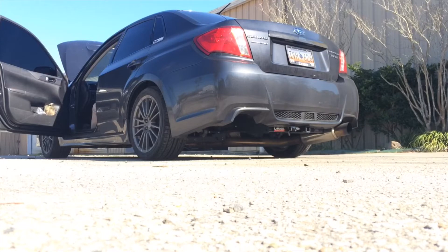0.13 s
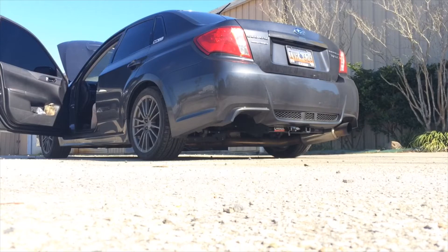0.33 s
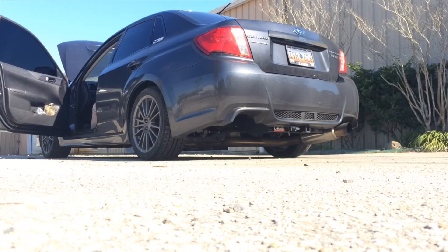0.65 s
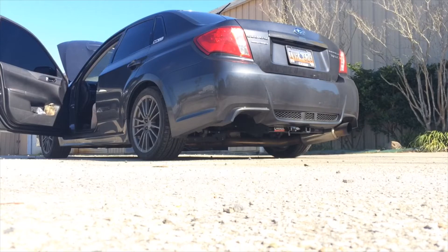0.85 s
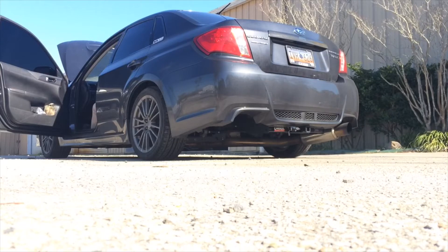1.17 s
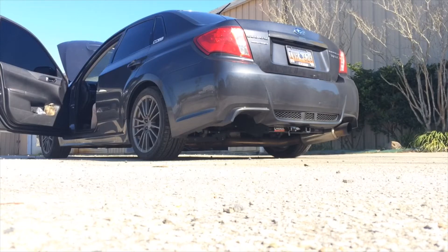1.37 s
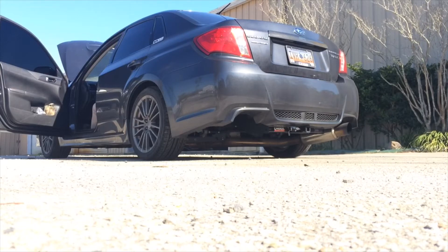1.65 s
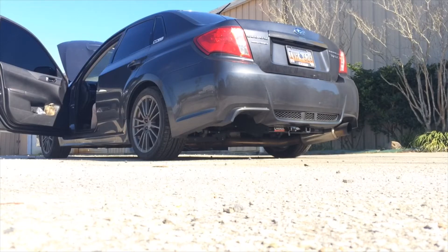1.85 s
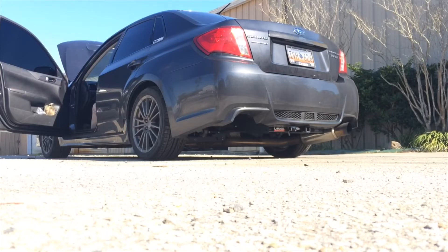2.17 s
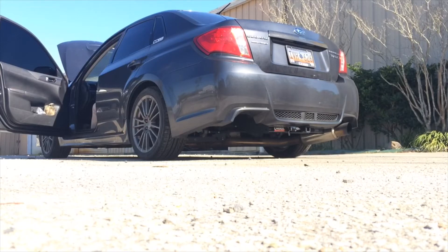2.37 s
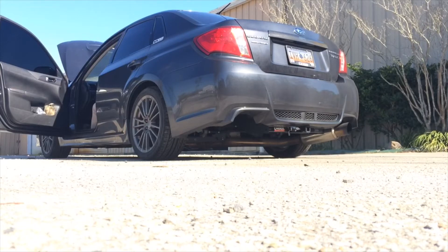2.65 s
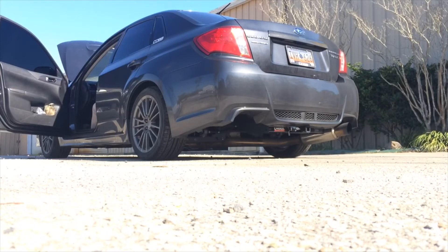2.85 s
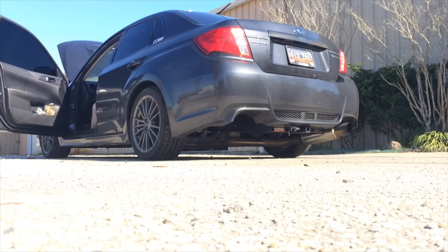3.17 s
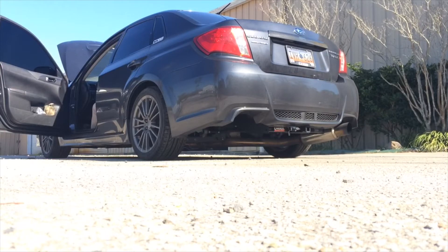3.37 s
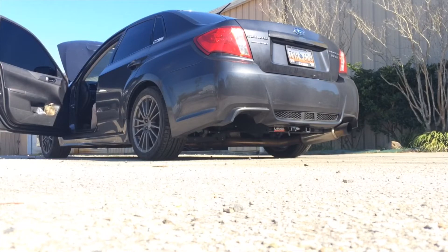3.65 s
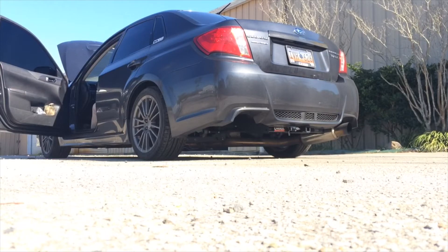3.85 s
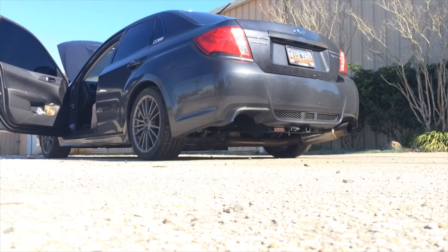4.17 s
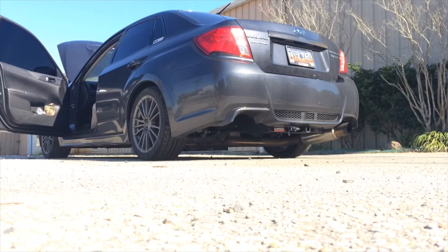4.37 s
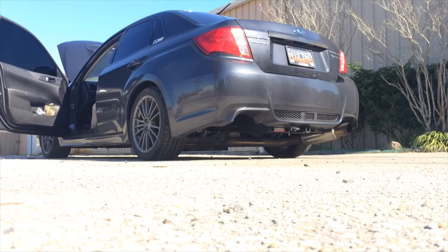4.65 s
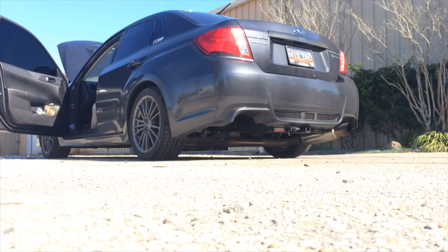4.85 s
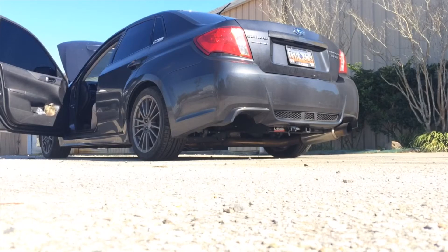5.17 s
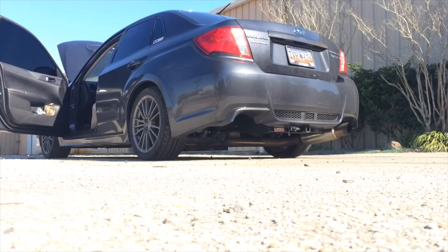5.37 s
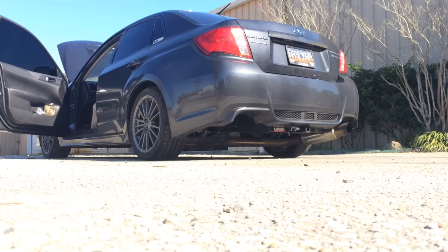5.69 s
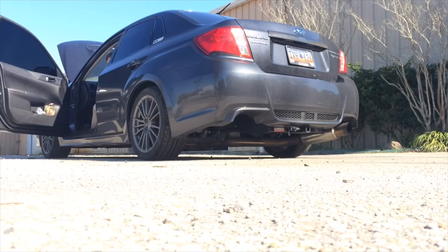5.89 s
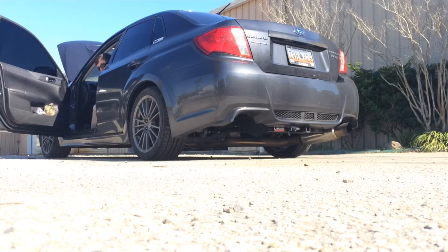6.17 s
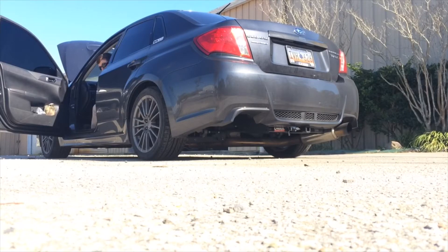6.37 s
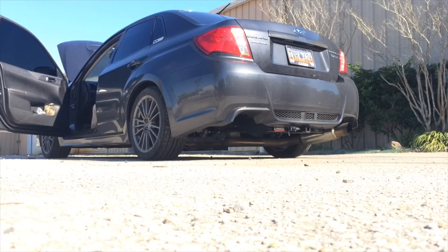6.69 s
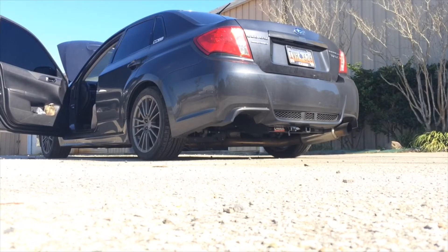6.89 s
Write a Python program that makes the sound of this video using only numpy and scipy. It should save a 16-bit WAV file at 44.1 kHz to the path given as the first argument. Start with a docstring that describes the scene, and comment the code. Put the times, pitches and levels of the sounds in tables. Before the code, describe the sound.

A turbocharged four-cylinder car idles with a lumpy lope, then is revved twice, barking and popping from the exhaust as the revs fall.

```python
"""An idling turbocharged flat-four lopes unevenly in a fenced yard, then its throttle is blipped twice.
Unequal headers make the firings lope; each one booms in the silencer and, when strong, steepens into a bark.
Shaped noise gives the rush of gas, and a wavering tone the turbo as it spins up and coasts down.
The strongest firings crack during the blips, and unburnt fuel pops in the pipe mostly as the revs fall.
Belts and valves whirr behind, metal squeaks faintly, and fence, wall and ground reflect it all."""
import sys
import numpy as np
from scipy import signal
from scipy.fft import rfft, irfft
from scipy.io import wavfile
from scipy.ndimage import uniform_filter1d, minimum_filter1d

SR = 44100
rng = np.random.default_rng(int(sys.argv[2]) if len(sys.argv) > 2 else 0)


def int16_out(signal):
    """Quantize to a 16-bit WAV file."""
    q = np.round(np.clip(np.atleast_2d(signal).T, -1, 1) * 32767)
    wavfile.write(sys.argv[1], SR, q.astype(np.int16))


N = 310023
TIME = np.arange(N) / SR

IDLE_HZ, IDLE_LOPE = 22, .45  # firings per second at idle; share of the lope left there
JITTER_S, BOOM_SCATTER_DB = .0005, 1.7  # chance in each firing at idle speed
# on throttle the cylinders push alike, until the pulses crowd each other in the headers near the top speed
EVEN_SHARE, CROWDED_HZ, CROWDING_SPAN_HZ = 0.718, 90.8, 17
# crowded pulses no longer break into sharp fronts: top speed for them, and the span over which they round off
SHARP_BELOW_HZ, SHARP_SPAN_HZ = 84.5, 3
# the four cylinders in firing order, with their differences at full lope: (header delay [ms], boom [dB],
# bark off throttle [dB], time of the reflection in the header [ms], its level [dB])
CYLINDERS = [(0.1, -0.5, 1.5, 18.3, -14), (-2.5, -2, -7, 10.3, -6), (-2.8, -4.5, -10, 10.6, -11),
             (-0.3, 1, 0.5, 18.3, -22)]


def exhaust(rate, turns):
    """Four cylinders fire in turn; each firing booms, barks and drags a puff of turbulence after it."""
    throttle, boom_db, bark_db, rasp_db, hiss_db = effort(rate)
    number = np.arange(int(turns[-1]))
    times = np.interp(number + .39, turns, TIME)
    lag_ms, own_boom_db, own_bark_db, header_ms, header_db = np.array(CYLINDERS)[number % len(CYLINDERS)].T
    time_chance, boom_chance, front_chance = rng.standard_normal((3, len(times)))

    def at(control):
        """Read a slowly changing control at each firing."""
        return np.interp(times, TIME, control)

    speed = at(rate)
    uncrowded = np.clip((CROWDED_HZ - speed) / CROWDING_SPAN_HZ, 0, 1)
    coasting = 1 - np.clip(EVEN_SHARE * at(throttle) * uncrowded, 0, 1)
    share = np.sqrt(SR / speed)  # a level is spread over fewer, larger pulses at low speed
    unsteady = IDLE_HZ / speed  # the flywheel evens out the firings as the speed rises
    # at idle the pulses are too far apart to disturb each other
    lope = coasting * np.clip(IDLE_LOPE / unsteady ** 2, 0, 1)
    fired = times + lope * lag_ms / 1000 + JITTER_S * time_chance * unsteady ** 2

    thud_db = at(boom_db) + lope * own_boom_db + BOOM_SCATTER_DB * boom_chance * np.sqrt(unsteady)
    thuds = boom(fired, share * undb(thud_db - 6.5), header_ms / 1000, header_db, coasting)
    # combustion is least steady at idle
    rumble = noise(THUD_COLOUR) * undb(boom_db - 8 - .17 * rate)

    push_db = coasting * (own_bark_db - 0.5)
    front_db = at(bark_db) + push_db
    barks = bark(fired, share, front_db)
    sharp = at(throttle * np.clip((SHARP_BELOW_HZ - rate) / SHARP_SPAN_HZ, 0, 1))
    fronts = shocks(fired, front_db + 0.3 * push_db + SHOCK_SCATTER_DB * front_chance, sharp)

    # at full strength the energy goes into the fronts, so ringing and roar level off
    body_db = bark_db - .45 * np.maximum(bark_db + 35, 0)
    ring = np.hypot(undb(at(body_db) + 0.4 * push_db - 6), at(overrun_growl()))
    growl = tailpipe(clicks(fired, share * ring))

    puff = puffs(fired, undb(push_db))
    gas = roar(puff, body_db, throttle) + rasp(puff, rasp_db, throttle)
    return drone(thuds, rate) + rumble + growl + hollow(pipe(barks + fronts + gas)) + hiss(puff, hiss_db)


OPEN_S, CLOSE_S = 0.033, 0.03
# the rush of gas follows the throttle late and dies away; a softer suck of air comes before it
RUSH_LAG_S, RUSH_FALL_DB_PER_S = .11, 25.5
SUCK_LEAD_S, SUCK_DB = 0.09, -67.5
CATCH_S, DIE_S, SURGE_S, OVERRUN_BOOM_DB = 0.047, 0.032, 0.27, 1
SPUTTER_EDGE_S = 0.016
# Levels here are balance settings between the layers, before each layer's own trim.
# the exhaust with the throttle shut: (firings per second [Hz], boom [dB], bark [dB], rasp [dB], hiss [dB])
COASTING = [(19.6, -25, -49, -56.5, -77.5), (29.5, -21, -52.5, -59, -79), (35.8, -19, -49.5, -54.5, -71),
            (46.7, -17.5, -42, -55.5, -68.5), (58, -16, -33, -51, -67.5), (89, -11.5, -33.5, -50.5, -63)]
# the exhaust with the throttle open: (firings per second [Hz], boom [dB], bark [dB], rasp [dB])
PULLING = [(22.4, -13, -49.5, -46), (33.8, -7, -25, -41), (53, -7, -22.5, -39.5), (59, -10, -21, -46),
           (73.2, -7.5, -17, -35), (86.27, -9, -22, -47.5)]
# blips of the throttle: (opens [s], closes [s], extra boom [dB], extra bark [dB], extra rasp [dB],
# rush of gas [dB])
BLIPS = [(0.454, 0.786, 2, -6.5, 0.5, -53), (3.498, 4.007, 1, -1, 3.5, -51.5)]
# spells of overrun, when fuel burns on in the pipe: (start [s], end [s], bark [dB], its fall [dB/s],
# first surge of boom [dB], growl [dB])
OVERRUNS = [(0.942, 1.258, -32.5, 12, 5, -36.5), (4.129, 5.224, -21.5, 16.5, 1.5, -38)]
# breathy sputters of gas: (time [s], length [s], rasp [dB], hiss [dB])
SPUTTERS = [(0.54, 0.018, -34, -64), (0.609, 0.011, -37, -59), (0.883, 0.019, -49, -78),
            (0.955, 0.025, -53, -71), (1.036, 0.032, -44.5, -72), (1.187, 0.023, -49, -69),
            (4.854, 0.032, -53, -77), (5.236, 0.11, -50, -65.5)]


def effort(rate):
    """Throttle (0-1) and levels of boom, bark, rasp and hiss (dB), from speed, blips, overrun and sputters."""
    boom_db, bark_db, rasp_db, hiss_db = at_speed(COASTING, rate)
    pull_boom, pull_bark, pull_rasp = at_speed(PULLING, rate)
    throttle = 0
    for opens, closes, extra_boom_db, extra_bark_db, extra_rasp_db, rush_db in BLIPS:
        pedal = gate(opens, closes, OPEN_S, CLOSE_S)
        throttle = throttle + pedal
        boom_db = blend(boom_db, pull_boom + extra_boom_db, pedal)
        bark_db = blend(bark_db, pull_bark + extra_bark_db, pedal)
        rasp_db = blend(rasp_db, pull_rasp + extra_rasp_db, pedal)
        hiss_db = blend(hiss_db, SUCK_DB, gate(opens - SUCK_LEAD_S, closes, OPEN_S, CLOSE_S))
        rush = rush_db - RUSH_FALL_DB_PER_S * (TIME - opens - RUSH_LAG_S)
        hiss_db = blend(hiss_db, rush, gate(opens + RUSH_LAG_S, closes, OPEN_S, CLOSE_S))
    for start, end, burn_db, fall, surge_db, _ in OVERRUNS:
        burning = gate(start, end, CATCH_S, DIE_S)
        age = np.maximum(TIME - start - CATCH_S, 0)
        bark_db = blend(bark_db, burn_db - fall * age, burning)
        boom_db = boom_db + burning * (OVERRUN_BOOM_DB + surge_db * np.exp(-(age / SURGE_S) ** 2))
    for start, length, sputter_rasp_db, sputter_hiss_db in SPUTTERS:
        sputter = gate(start, start + length, SPUTTER_EDGE_S, SPUTTER_EDGE_S)
        rasp_db = blend(rasp_db, sputter_rasp_db, sputter)
        hiss_db = blend(hiss_db, sputter_hiss_db, sputter)
    return throttle, boom_db, bark_db, rasp_db, hiss_db


def overrun_growl():
    """Strength of the even ringing that every firing leaves in the tailpipe while fuel burns on."""
    return sum(gate(start, end + DIE_S, CATCH_S, DIE_S) * undb(growl_db)
               for start, end, *_, growl_db in OVERRUNS)


# the far end of the exhaust sends the boom back: delay and share
SILENCER_ECHO_S, SILENCER_RETURN = 0.02965, 0.34
# tone colour of a round thud: (frequency [Hz], level [dB])
THUD_COLOUR = [(20, -25), (40, -12), (62, -1.5), (82, -3.5), (103, 5), (120, 3), (142, 1.4), (175, -6),
               (200, -16), (225, -14), (260, -28), (400, -36.5), (900, -105.5), (5000, -125)]


def boom(times, sizes, header_s, header_db, coasting, trough_s=0.002):
    """The silencer rounds each firing to a few swings; header and tailpipe reflections fill the gaps."""
    thud = response(THUD_COLOUR)
    start = times + trough_s - np.argmin(thud) / SR  # puts the deepest swing just after the firing
    # the reflection comes back inverted, at full strength at every speed the engine reaches here
    reflected = undb(header_db) * np.minimum(0.069 / np.gradient(times), 1) ** 2
    direct = clicks(start, sizes * coasting)
    returned = clicks(start + header_s, reflected * sizes * coasting)
    round_part = through(direct - returned, thud)
    # on throttle the pulse is tighter and higher
    tight = response([(25, -55.5), (60, -2), (100, 1), (150, 3.5), (195, 2.5), (240, -14.5),
                      (400, -24.0), (900, -75.0), (5000, -125)])
    tight_start = times + trough_s - np.argmin(tight) / SR
    x = round_part + through(clicks(tight_start, sizes * (1 - coasting)), tight)
    return x + SILENCER_RETURN * delayed(x, SILENCER_ECHO_S)


def drone(x, rate, hz=147, width_hz=15, gain_db=7, from_hz=80, span_hz=5):
    """Near the top speed the silencer resonates and drones."""
    ring = signal.lfilter(*signal.iirpeak(hz, hz / width_hz, fs=SR), x)
    return x + undb(gain_db) * np.clip((rate - from_hz) / span_hz, 0, 1) * ring


# tone colour of a bark: (frequency [Hz], level [dB])
BARK_COLOUR = [(90, -21), (220, -8.5), (330, -2.5), (480, 6.5), (660, 10.5), (780, 2.5), (950, -7),
               (1400, -28.5), (2200, -41), (3500, -59.5), (9000, -90.5)]


def bark(times, share, front_db):
    """Weak pulses stay round and lose bark; strong ones steepen into a full bark."""
    steep_db = np.clip(1.5 * (front_db + 31.0), -9, 0)
    return -through(clicks(times, share * undb(front_db + steep_db - 10.5)), response(BARK_COLOUR))


# shock fronts: level against the bark, bark below which they fade out, chance in each front's level
SHOCK_DB, SHOCK_FROM_DB, SHOCK_SCATTER_DB = 5, -31, 1.5


def shocks(times, front_db, sharp, sharp_db=2.5, swell_s=.0045, size=1024):
    """N-shaped fronts: the pressure climbs, drops and recovers, abruptly on throttle and roundly off it."""
    db = front_db + SHOCK_DB + np.minimum(front_db - SHOCK_FROM_DB, 0)
    middle_s = TIME[size // 2]
    t = TIME[:size] - middle_s
    # rise [s], swing [s], share of slow swell, strength of each firing
    sharp_kind = (.00017, .0005, .15, sharp * undb(sharp_db))
    round_kind = (.0003, .0008, .7, 1 - sharp)
    out = 0
    for rise_s, swing_s, swell, strength in (sharp_kind, round_kind):
        swing = np.exp(-np.hypot(t, rise_s) / swing_s) + swell * np.exp(-(t / swell_s) ** 2)
        front = -np.tanh(t / rise_s) * swing
        out = out + through(clicks(times - middle_s, strength * undb(db)), front / front.max())
    return out


# tailpipe resonances: (frequency [Hz], width [Hz], relative level [dB])
TAILPIPE = [(222.8, 14, 5), (326.6, 9.8, 4), (372.5, 13, 9), (406, 26, 6), (433, 33, -4), (515, 71, -10),
            (640, 30, -5.5), (690, 20, -14)]


def tailpipe(x, size=8192):
    """The tailpipe rings on after each pulse, which draws out the engine's orders as a growl."""
    t = TIME[:size]
    ringing = 0
    for k, (hz, width, db) in enumerate(TAILPIPE):
        decay = width * np.exp(-np.pi * width * t)
        ringing = ringing + (-1) ** k * undb(db) * decay * np.sin(2 * np.pi * hz * t)
    colour = [(100, -28.5), (220, 2.5), (800, -16.5), (2000, -33.5), (6000, -60.5)]
    ringing = through(ringing, response(colour))
    return through(x, ringing / np.linalg.norm(ringing))


PUFF_RISE_S, PUFF_S = .001, .008


def puffs(times, sizes):
    """Strength of the turbulence behind each firing: a quick rise and a short decay."""
    t = TIME[:SR // 10]
    shape = np.exp(-t / PUFF_S) * np.tanh(t / PUFF_RISE_S) ** 2
    return unit(through(clicks(times, sizes), shape))


# tone colour of the roar: (frequency [Hz], level [dB])
ROAR_COLOUR = [(150, -18), (260, 0), (390, 8.5), (520, 5.5), (680, -7), (900, -13.5), (1500, -17),
               (4000, -49.5)]


def roar(puff, body_db, throttle):
    """Low turbulent noise that surges with each puff."""
    surge = unit(1.4 + puff)
    return noise(ROAR_COLOUR) * surge * undb(body_db - 11 + 2 * throttle)


# tone colour of the rasp: (frequency [Hz], level [dB])
RASP_COLOUR = [(150, -23.5), (400, 5.5), (700, 7), (1100, 2.5), (1700, -5), (2600, -13.5), (4000, -19),
               (8000, -45.5), (15000, -56)]


def rasp(puff, rasp_db, throttle):
    """Rough gas noise, fairly steady at idle and coming in blasts on throttle."""
    blast = unit(2.4 * (1 - .8 * throttle) + puff)
    return noise(RASP_COLOUR) * blast * undb(rasp_db + 1.6 * wander(27) + 1.5)


# tone colour of the hiss: (frequency [Hz], level [dB])
HISS_COLOUR = [(800, -14), (2500, -12), (4000, 0), (5200, 0.5), (6600, 1.5), (8000, -3), (10500, -6),
               (13000, -12), (15500, -16.5)]


def hiss(puff, hiss_db):
    """Bright noise of the streaming gas; slow gas leaves the pipe almost silently."""
    stream = unit(4.5 + puff)
    slow_db = np.clip(0.44 * (hiss_db + 79.0), -9, 0)
    return noise(HISS_COLOUR) * stream * undb(hiss_db + .5 * wander(40) + 2.0 + slow_db)


PIPE_ECHO_S, PIPE_RETURN = 0.013, 0.23  # time and share kept on each trip


def pipe(x, count=4):
    """A front runs to and fro in the exhaust pipe, weaker on each trip."""
    return sum(PIPE_RETURN ** k * delayed(x, k * PIPE_ECHO_S) for k in range(count))


HOLLOW_HZ, HOLLOW_WIDTH_HZ, HOLLOW_SHARE = 264.4, 28, 0.26


def hollow(x):
    """The pipe swallows a share of a narrow band between its boom and its growl."""
    band = signal.lfilter(*signal.iirpeak(HOLLOW_HZ, HOLLOW_HZ / HOLLOW_WIDTH_HZ, fs=SR), x)
    return x - HOLLOW_SHARE * band


# loud cracks: the sharpest firings of the blips, and pops of unburnt fuel in the pipe:
# (time [s], level [dB], extra snap near 1 kHz [dB], extra brightness above it [dB])
CRACKS = [(0.555, -17, 4, -11), (0.652, -9.5, 3, -9), (0.741, -4.5, -8, -18), (0.7718, 0, -19, -29),
          (1.606, -19.5, -2, -37), (1.612, -11, -4, -34), (1.617, -26, 10, -9), (1.627, -24, 12, -20),
          (1.643, -25, -13, -32), (3.692, -14, -5, -18), (3.775, -6.5, 7, -20), (3.824, -2.5, 3.5, -11),
          (3.868, -3.5, 5.5, -8), (4.575, -13, -5, -38.5), (4.605, -9, 4.5, -44), (4.6176, -5, 11, 1.5),
          (4.64, 1.5, -1.5, -6), (4.650, -7.5, -2, -4.5), (5.085, -19.5, -9, -35), (5.125, -7, -10.5, -18),
          (5.156, -17, -8, -27), (5.178, -17.5, -1, -17), (5.201, -19.5, -11, -27), (5.522, -29, -14, -22),
          (6.228, -20.5, -18, -50), (6.233, -15.5, -14, -21), (6.258, -33, -9, -36), (6.268, -36, -10, -45),
          (6.526, -35, 0, -38), (6.827, -31.5, -7, -38), (6.974, -34, -8, -30)]


def cracks(thump_db=-6, flutter_db=-24, flutter_s=0.023, size=8192):
    """Hard firings and fuel lit in the pipe crack: a swell to a round front, a silencer thump, fluttering gas."""
    out, t = np.zeros(N), TIME[:size]
    lead = size // 32  # room for the swell before the peak
    thump = response([(50, -17.5), (120, -9.5), (170, 6), (230, -4), (320, -28), (1200, -63), (5000, -110)])
    thump = undb(thump_db) * thump / np.abs(thump).max()
    for s, db, snap_db, bright_db in CRACKS:
        colour = response([(60, -16.5), (200, 4.5), (450, 2.5), (720, -5), (1100, -14 + snap_db),
                           (2000, -18.5 + bright_db), (3500, -34.0 + bright_db), (12000, -53.5 + bright_db)])
        front = np.roll(irfft(np.abs(rfft(colour))), lead)  # the same swell before and after the peak
        flutter = through(rng.standard_normal(size), colour) * np.exp(-t / flutter_s)
        after = undb(flutter_db) * flutter - thump
        crack = np.pad(after, (lead, 0))[:size] - front / front.max()
        start = int(s * SR) - lead
        out[start:start + size] += undb(db) * crack[:N - start]
    return pipe(out)


# path of the turbo: (time [s], whistle pitch [Hz], level before the breath and line settings [dB])
TURBO = [(0, 1162, -69), (.6, 1510, -75), (1.0, 2080, -58), (1.3, 2250, -56), (1.65, 2190, -54.5),
         (2.0, 1990, -60), (2.3, 1850, -60), (2.65, 1670, -58), (3.0, 1520, -61), (3.45, 1330, -58),
         (4.05, 3800, -63), (4.3, 3620, -55.5), (4.6, 3380, -58), (5.3, 3100, -61), (5.7, 2620, -63),
         (6.0, 2380, -60.5), (6.5, 1990, -59), (7.03, 1690, -61)]


def turbo(turns, width_hz=150, breath_db=-10.5, line_db=-13, pure_hz=1700, blur_db_per_hz=.013,
          waver=.01, flutter_db=1.5, throb_db=4.5):
    """A breathy whistle follows the turbine shaft, purer as it slows; every firing nudges it."""
    pitch = curve(TURBO)
    phase = 2 * np.pi * np.cumsum(pitch * (1 + waver * wander(60))) / SR
    breath = unit(wander(width_hz) * np.cos(phase) + wander(width_hz) * np.sin(phase))
    blur_db = blur_db_per_hz * np.maximum(pitch - pure_hz, 0)
    line = unit(np.sin(phase)) * undb(line_db - blur_db)
    throb = throb_db * np.cos(2 * np.pi * turns)
    level_db = curve(TURBO, axis=2) + throb + flutter_db * wander(21)
    return (undb(breath_db) * breath + line) * undb(level_db)


# tone colour of the whirr: (frequency [Hz], level [dB])
BAY_COLOUR = [(1180, -8), (2000, -2.5), (2190, -5), (2580, -3), (3580, -6.5), (4810, -8), (5190, -9.5),
              (5690, -13), (6240, -8), (7020, -18.5), (8600, -16), (10000, -22.5), (15000, -33.5)]


def engine_bay(turns):
    """Whirr of belts and valves and a faint singing band, with a soft swish once in each engine cycle."""
    cycle = (turns - 2.7) / len(CYLINDERS)
    swell = np.exp(4 * (np.cos(2 * np.pi * cycle) - 1))
    swish = swell * noise([(2000, -14.5), (5000, 0.0), (9000, -8.5), (15000, -14)])
    whirr = noise(BAY_COLOUR) * undb(-66.0 + 2.0 * wander(38))
    sing = noise([(4000, -31.0), (6000, -11.5), (6300, 6.5), (6600, -16.0), (9000, -50.5)])
    return whirr + undb(-75.5) * swish + undb(-95.0) * sing


# faint metal squeaks: (time [s], length [s], pitch [Hz], level [dB])
SQUEAKS = [(2.965, 0.073, 5211, -65), (3.337, 0.062, 1825, -57.5), (3.335, 0.067, 3880, -67.5),
           (3.335, .075, 5650, -67.5)]


def squeaks(waver=0.0062):
    """Short thin squeaks of metal on metal: wavering tones that swell and fade."""
    out = 0
    for s, length, hz, db in SQUEAKS:
        swell = np.sin(np.pi * np.clip((TIME - s) / length, 0, 1))
        phase = 2 * np.pi * np.cumsum(hz * (1 + waver * wander(80))) / SR
        out = out + undb(db) * swell * np.sin(phase)
    return out


# reflections from fence, wall and ground: (delay [s], level [dB])
ECHOES = [(0.017, -17.5), (.034, -12.5)]


def yard(x, tail_db=-20, t60=0.35):
    """A few hard reflections and a short scattered tail that falls 60 dB in t60 seconds."""
    t = TIME[:SR // 2]
    tail = rng.standard_normal(len(t)) * np.exp(-np.log(1000) * t / t60) * (t > .02)
    reflections = sum(undb(db) * delayed(x, s) for s, db in ECHOES)
    return x + reflections + undb(tail_db) * through(x, tail / np.linalg.norm(tail))


def undb(db):
    """Decibels to gain."""
    return 10 ** (np.asarray(db) / 20)


def curve(table, axis=1):
    """One column of a table, joined by straight lines in time."""
    rows = np.asarray(table)
    return np.interp(TIME, rows[:, 0], rows[:, axis])


def at_speed(table, rate):
    """The levels that a table gives at each moment's engine speed."""
    hz, *columns = np.transpose(table)
    return np.array([np.interp(rate, hz, db) for db in columns])


def gate(start, end, attack_s, release_s):
    """Attack, hold and release, from 0 to 1."""
    return np.clip((TIME - start) / attack_s, 0, 1) * np.clip(1 - (TIME - end) / release_s, 0, 1)


def blend(old, new, amount):
    """Move from one level to another as the amount goes from 0 to 1."""
    return old + amount * (new - old)


def unit(x):
    """Scale to rms 1."""
    return x / np.sqrt(np.mean(x ** 2))


def through(x, response):
    """Pass a sound through an impulse response."""
    return signal.fftconvolve(x, response)[:len(x)]


def response(colour, size=8192):
    """Causal impulse response of unit energy with the given colour."""
    hz, db = np.transpose(colour)
    bins = np.maximum(np.fft.rfftfreq(size, 1 / SR), 1)
    cepstrum = irfft(np.log(undb(np.interp(np.log(bins), np.log(hz), db))))
    # folding the cepstrum forward gives minimum phase: the energy comes as early as it can
    cepstrum[1:size // 2] *= 2
    cepstrum[size // 2 + 1:] = 0
    h = irfft(np.exp(rfft(cepstrum)))
    return h / np.linalg.norm(h)


def noise(colour):
    """Coloured noise of about rms 1."""
    return through(rng.standard_normal(N), response(colour))


def wander(hz):
    """Slow chance of rms 1: noise kept below the given frequency."""
    low = signal.butter(2, hz, fs=SR, output="sos")
    return unit(signal.sosfilt(low, rng.standard_normal(N)))


def clicks(times, sizes):
    """Single-sample kicks at the given times."""
    return np.bincount(np.clip(np.round(times * SR).astype(int), 0, N - 1), sizes, N)


def delayed(x, seconds):
    """The same sound, later."""
    return np.interp(TIME - seconds, TIME, x, left=0)


# engine speed: (time [s], firings per second [Hz])
SPEED = [(0.0, 22.61), (0.481, 24.07), (0.788, 68.32), (1.05, 55.96), (1.38, 44.8), (1.72, 36.51),
         (2.423, 27.05), (2.918, 22.83), (3.506, 21.81), (3.631, 28.88), (3.909, 82.12), (4.028, 88.78),
         (4.484, 69.33), (5.171, 45.59), (5.446, 38.1), (5.964, 29.87), (6.269, 27.97), (7.03, 26.74)]


def scene():
    """The engine's speed times the firings, the turbo's throb and the engine-bay swish."""
    rate = curve(SPEED)
    turns = np.cumsum(rate) / SR  # firings so far
    engine = exhaust(rate, turns) + cracks() + turbo(turns)
    return yard(engine + engine_bay(turns) + squeaks())[None]


CEILING, TOP_HZ = .53, 15000  # limiter level of full scale; upper edge of the sound


def record(dry, hold_s=0.012):
    """A fast limiter holds the peaks; the deepest bass and the top are cut."""
    dry = signal.sosfilt(signal.butter(1, 12, "high", fs=SR, output="sos"), dry)
    hold = max(int(hold_s * SR), 1)
    needed = CEILING / np.maximum(np.abs(dry), CEILING)
    gain = uniform_filter1d(minimum_filter1d(needed, hold), hold)
    return signal.sosfilt(signal.ellip(8, .2, 70, TOP_HZ, fs=SR, output="sos"), dry * gain)


dry = scene()
out = record(dry)
int16_out(out)
```